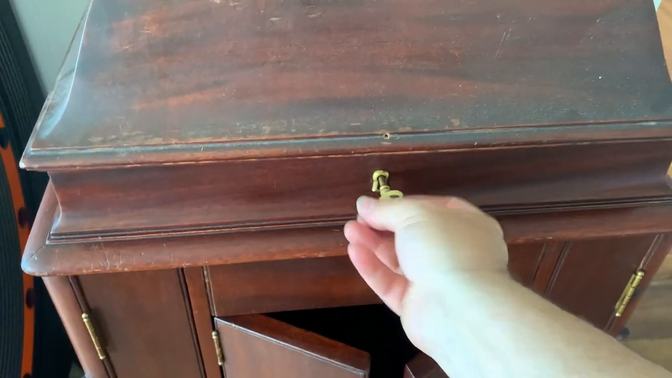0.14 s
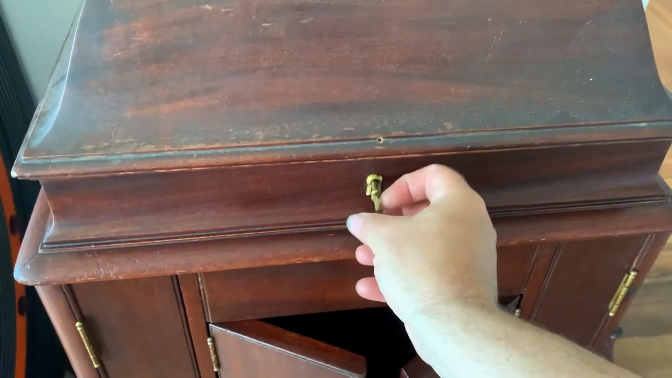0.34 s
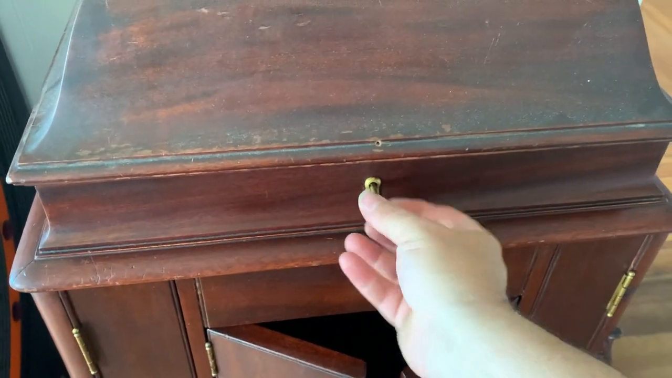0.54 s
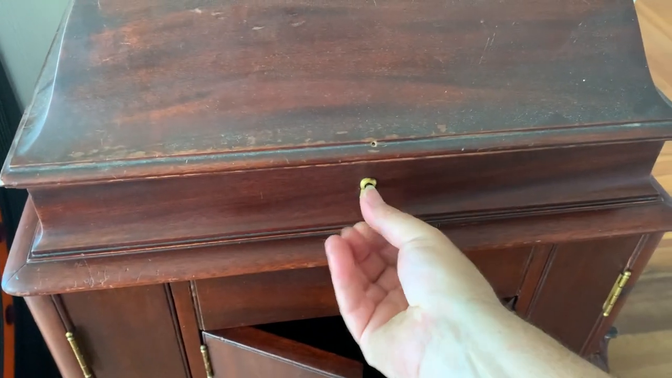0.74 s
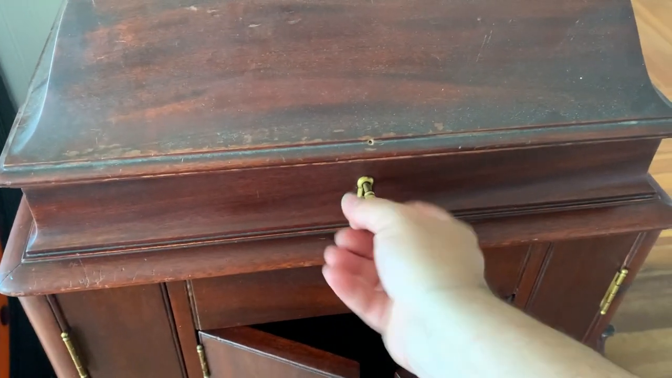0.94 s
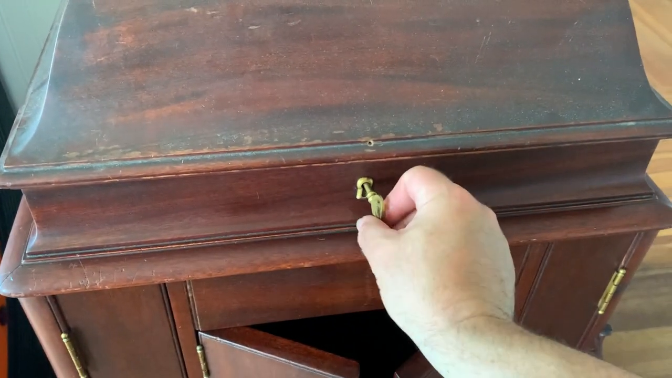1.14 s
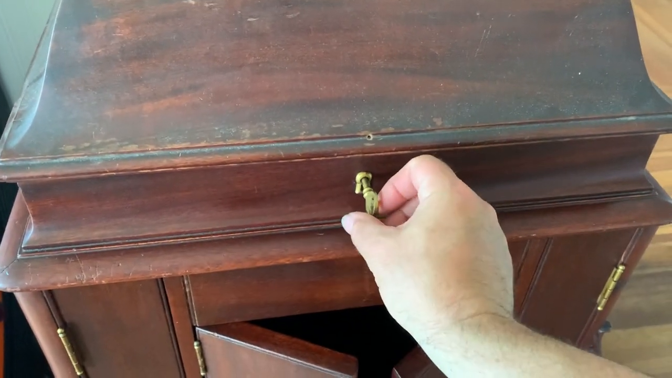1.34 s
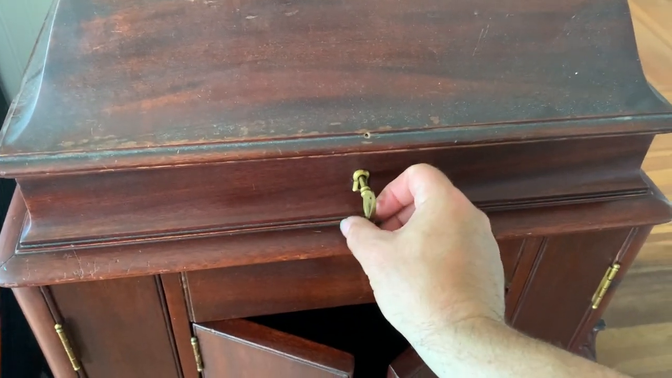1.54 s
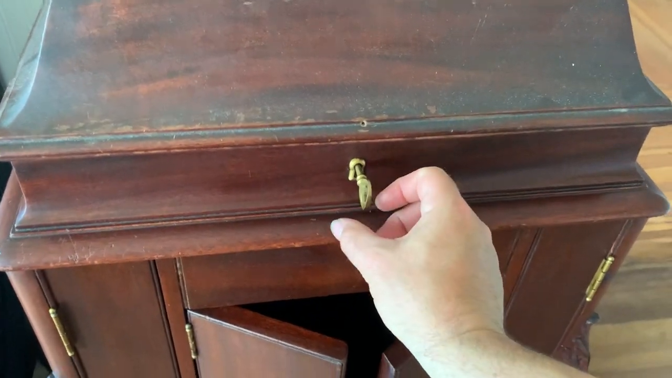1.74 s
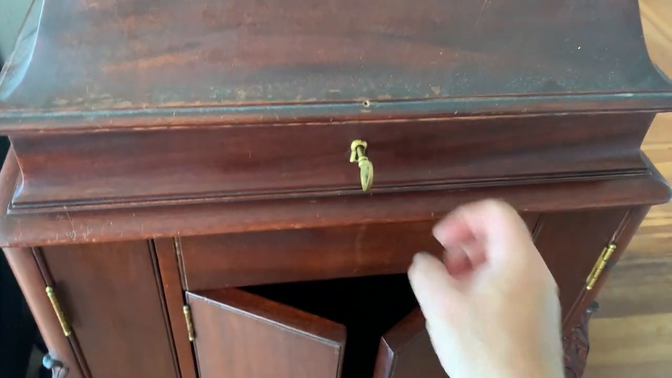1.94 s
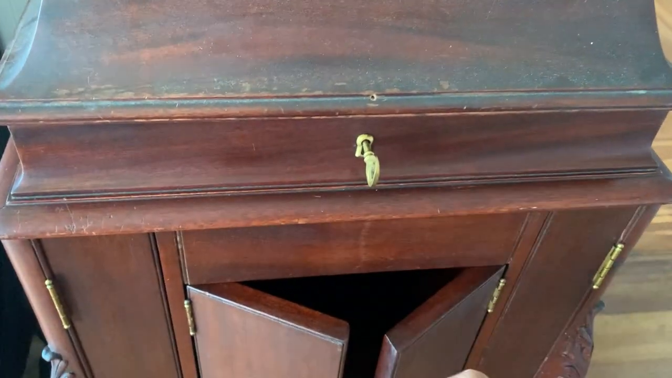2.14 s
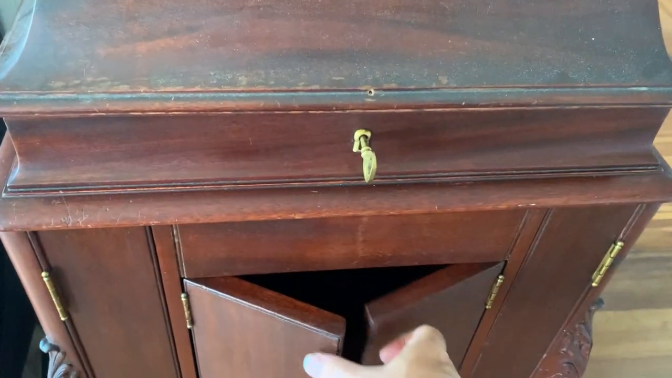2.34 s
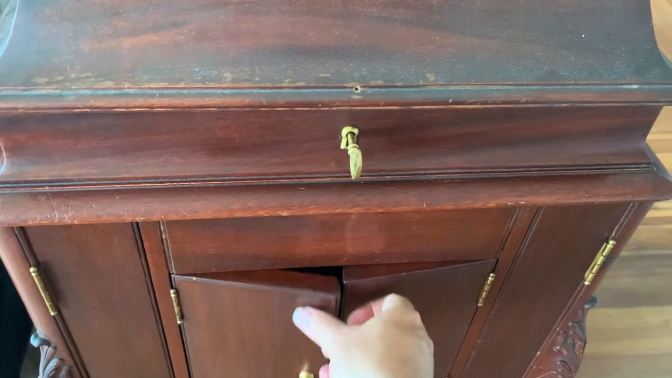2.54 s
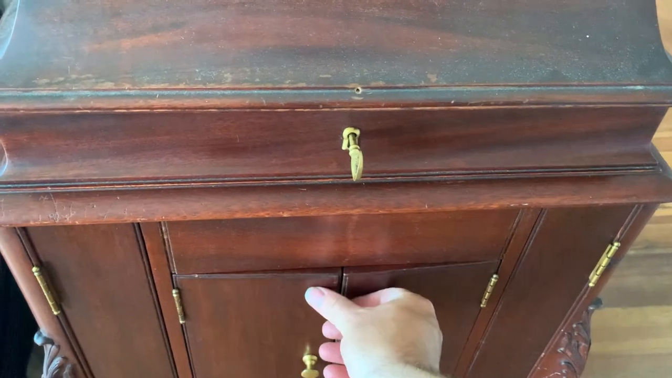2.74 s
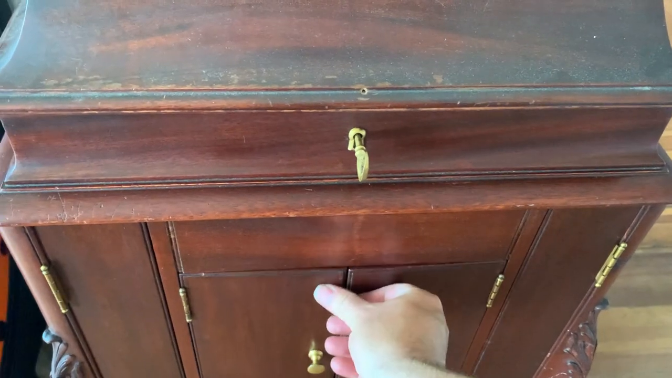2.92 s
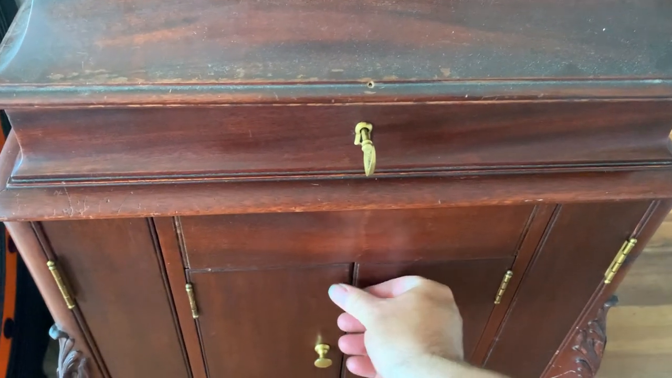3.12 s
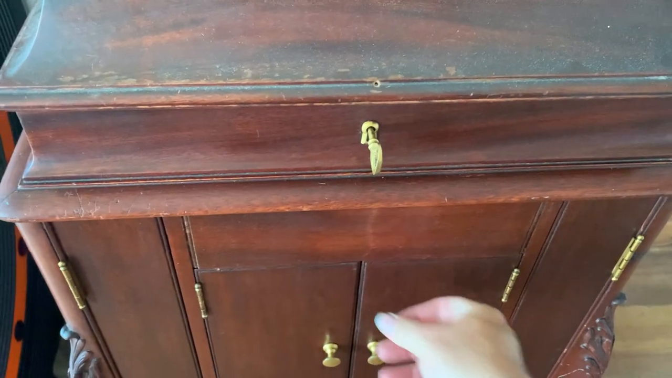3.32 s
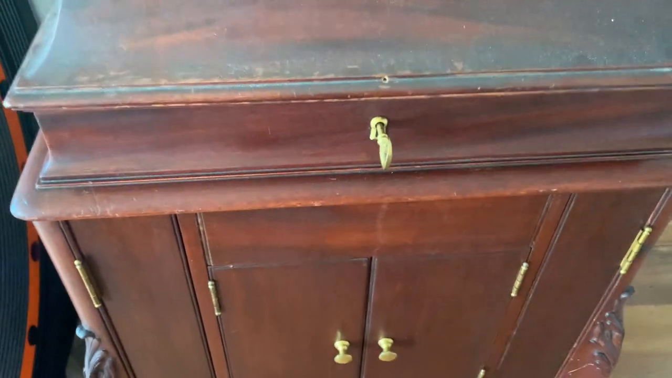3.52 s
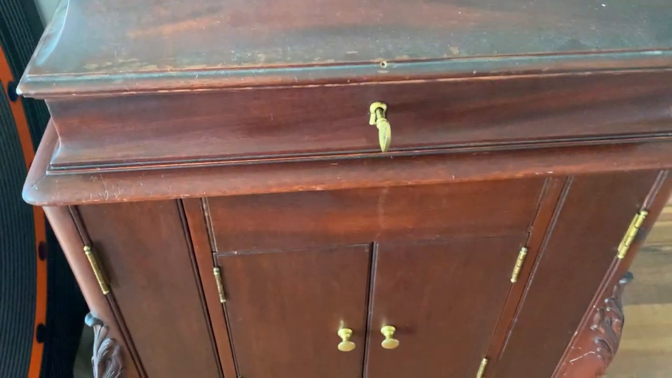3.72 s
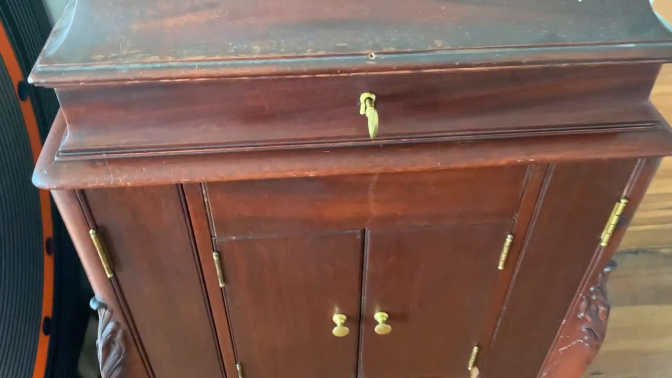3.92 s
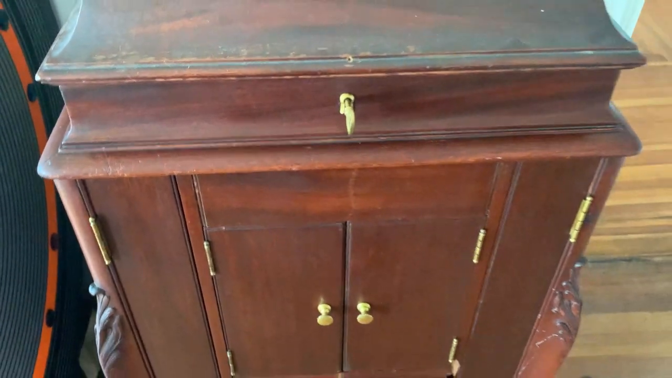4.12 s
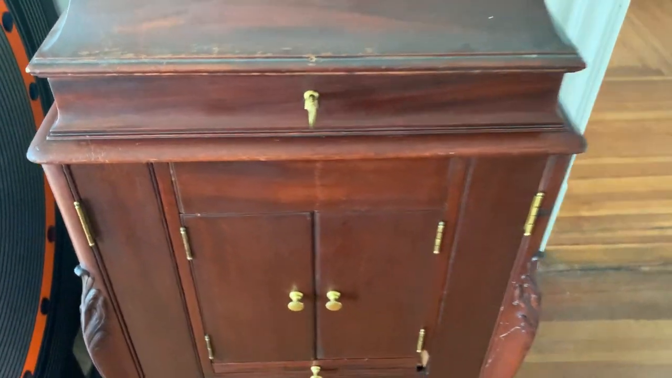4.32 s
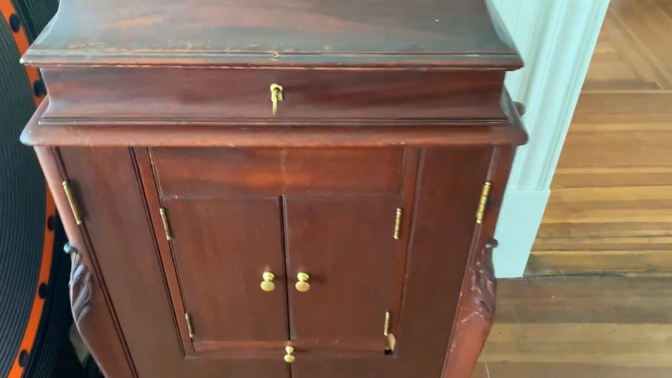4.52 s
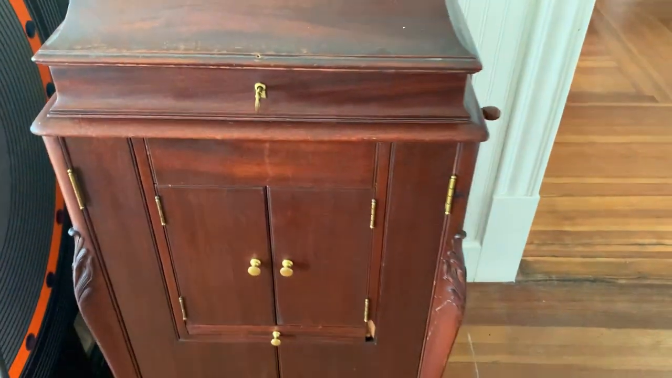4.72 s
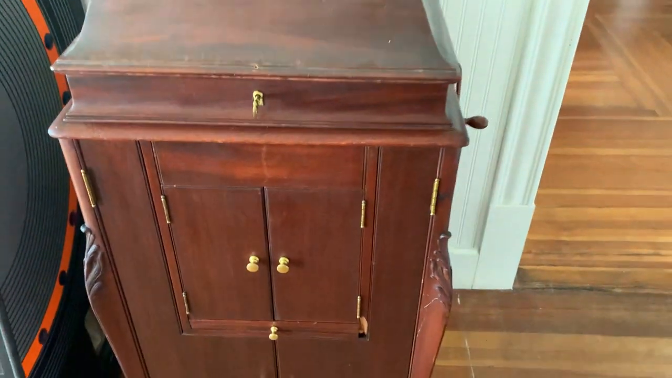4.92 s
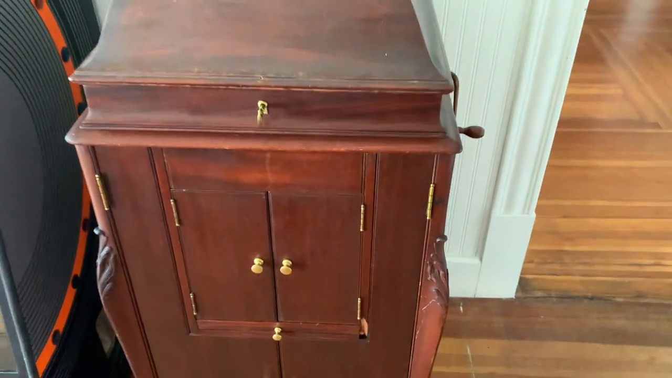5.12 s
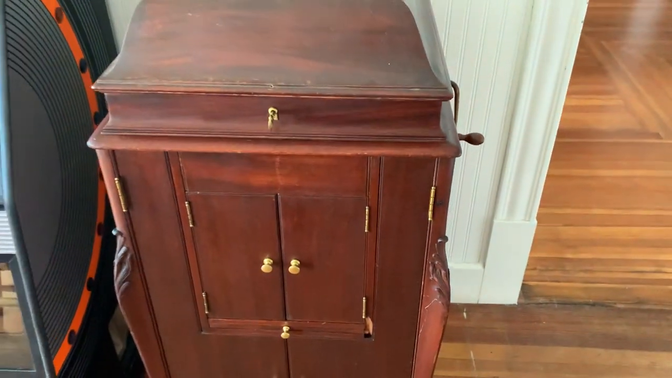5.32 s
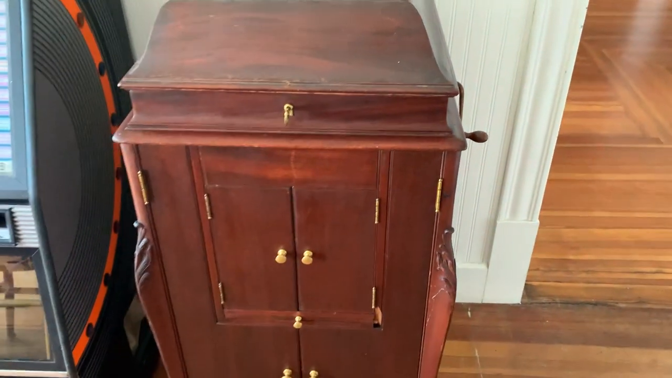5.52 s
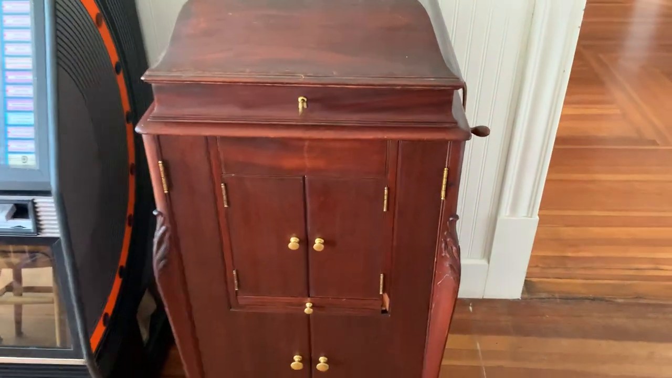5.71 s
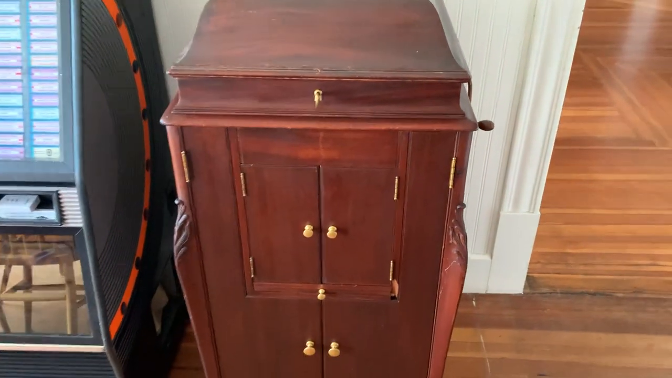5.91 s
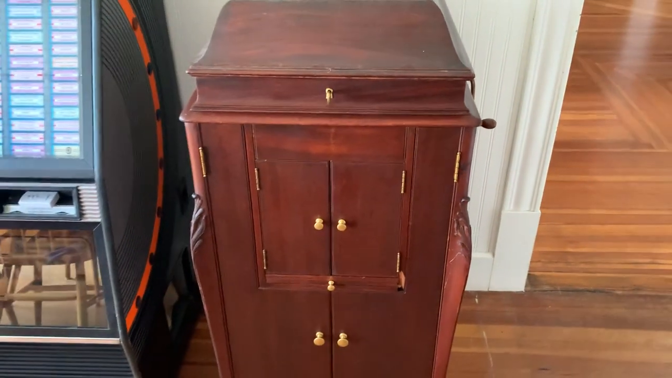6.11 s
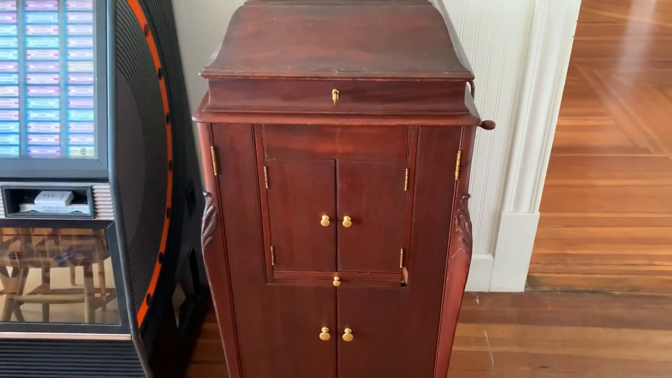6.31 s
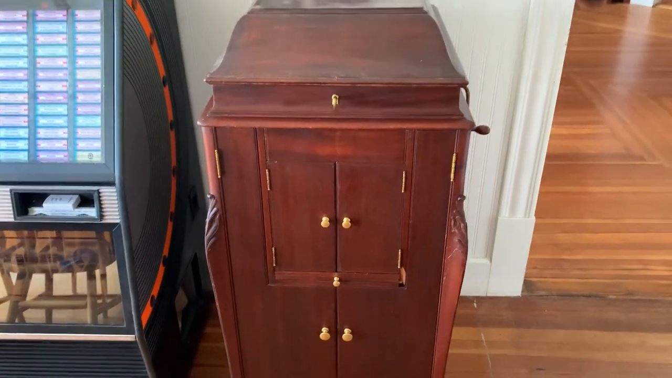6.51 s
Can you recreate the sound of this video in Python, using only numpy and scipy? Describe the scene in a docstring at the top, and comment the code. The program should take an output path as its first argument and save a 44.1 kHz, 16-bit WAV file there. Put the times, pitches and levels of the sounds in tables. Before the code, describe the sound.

A small brass key clicks faintly in an old wooden cabinet, then two little doors shut with a light knock and a loud hollow double clack.

```python
"""A brass key clicks and rubs in the lid of an old wooden cabinet; its two small doors are pushed shut with
a light knock, a touch and a loud double clack that booms in the case; steps go back over ticking boards.
Contacts are noise bursts and decaying modes, rubbing is grains of noise, thuds are swelling sines.
A live room adds a diffuse tail, ventilation noise, a low hum and a faint whirr, heard by a hand-held phone."""
import sys
import numpy as np
from scipy import signal
from scipy.fft import rfft, irfft
from scipy.io import wavfile
from scipy.ndimage import uniform_filter1d

SR = 44100
rng = np.random.default_rng(int(sys.argv[2]) if len(sys.argv) > 2 else 0)


def bounce(signal):
    """Save signal as a 16-bit WAV file at the path given by the first command-line argument."""
    frames = np.transpose(np.atleast_2d(signal))
    limited = np.clip(frames, -1, 1)
    pcm = np.round(limited * 32767).astype(np.int16)
    wavfile.write(sys.argv[1], SR, pcm)


N = 293696
T = np.arange(2 ** 15) / SR  # time since a blow, s
TIME = np.arange(N) / SR  # time in the scene, s

# clicks of the brass key and its tag in the lock; levels are relative:
# start_s, level_db, body_db, treble_db
KEY_CLICKS = [(0.0382, -39.5, 1, -24), (.055, -49.5, 6.5, -8.5), (.347, -44.5, -6, -17),
              (0.422, -43, -22, -4.5), (.593, -41, -6.5, -19), (0.926, -43, -3, -33), (.980, -35, -11, -11),
              (0.997, -42.5, -1.5, -3), (1.0255, -36.5, -24, 6), (1.1192, -38.5, -18, -4),
              (1.4228, -34, -8, -13), (1.4262, -38.5, 0, -27)]


def doors():
    """Impact excitation: each blow cracks at the edge and rings the door's panel modes and the brass catch."""
    # a door meets its frame; levels are relative:
    # start_s, door, panel_db, crack_db, crack_treble_db, catch_db
    impacts = [(2.6976, "left", -38, -30.5, -10, -47), (2.7011, "left", -26.5, -45, -18, -52.5),
               (2.7109, "left", -31, -37, -5, -38.5), (2.9393, "right", -38.5, -35.5, -9, -39),
               (2.945, "left", -37, -51, -19.5, -63), (2.9720, "left", -43.5, -56, -26.5, -65),
               (3.0241, "right", -9.5, -8.5, -3.5, -25), (3.0344, "right", -19, -15, -11, -36),
               (3.0402, "right", -9, -5.5, -3.5, -15.5), (3.051, "right", -23.5, -20.5, -6, -34.5)]
    # panel modes by door: frequency_hz, level_db, t60_s
    panel_modes = {"left": [(123.5, -8.5, 0.31), (241, 2, .09), (347, -8.5, 0.1), (385, -8, .14),
                   (880, -13.5, 0.024), (994, -2.5, 0.067), (1170, -16.5, 0.014), (1380, -14.5, 0.022),
                   (2280, -14.5, .03)], "right": [(151, -12, 0.27), (244, -14.5, 0.3), (345, -5.5, 0.13),
                   (454, -9.5, 0.23), (510, -4, 0.1), (579.4, -2.5, 0.17), (605, -5, 0.15),
                   (745, -16, 0.069), (855, -17.5, 0.042), (964, -5.5, .05), (1020, -13, 0.088),
                   (1180, -17.5, 0.09), (1757, -24.5, .1), (2130, -20, 0.044)]}
    # modes of the brass catch: frequency_hz, level_db, t60_s
    catch_modes = [(2282, -8.5, 0.015), (2520, 3, 0.043), (2630, -8.5, 0.032), (2735, -5, 0.078),
                   (4420, -10.5, .03)]
    # spectrum of the crack: frequency_hz, level_db
    crack_colour = [(100, 3), (330, 13), (550, 7.5), (800, 1), (1150, -0.5), (1450, -3), (2600, 0.5),
                    (3300, -5.5), (4200, -3.5), (5300, -9), (7200, -0.5), (11000, -0.5), (15000, -13)]
    cracks, rings = np.zeros(N), np.zeros(N)
    catch = ring(catch_modes)
    for s, door, panel_db, crack_db, treble_db, catch_db in impacts:
        edge = crack(crack_colour, t60=0.036, ring_db=-14.5, ring_t60=0.12)
        edge = tint(edge, [(2800, 0.0084), (7000, treble_db)])
        add(cracks, s, amp(crack_db) * edge)
        panel = ring(panel_modes[door])
        add(rings, s, amp(panel_db) * panel + amp(catch_db) * catch)
    return cracks, rings


def boom():
    """Cavity resonance: the case's deep modes build up over a few cycles, then die away quickly."""
    # slow modes of the hollow case: frequency_hz, level_db, swell_s
    case_modes = [(66.1, -19.5, 0.028), (109.6, -16.5, 0.044), (128.3, -27.5, 0.037)]
    # each door's shutting sets the case booming: start_s, level_db
    shuttings = [(2.708, -25.5), (3.034, -0.5)]
    case = 0
    for hz, db, rise_s in case_modes:
        case = case + amp(db) * swell(T, rise_s) ** 2 * np.sin(2 * np.pi * hz * T)
    out = np.zeros(N)
    for s, db in shuttings:
        add(out, s, amp(db) * case)
    return out


def key():
    """Light metal impacts coupled to wood: the key clicks, lid and lock ring, and the brass rubs."""
    # spectrum of a key contact: frequency_hz, level_db
    key_colour = [(100, -19), (250, -5), (500, 4), (900, -1.5), (1500, 3.5), (3000, -3.5), (4200, -3.5),
                  (5600, -6.5), (11000, -2), (15000, -70)]
    # small ring of lid and lock under the key: frequency_hz, level_db, t60_s
    lid_modes = [(460, -17, 0.11), (582, -17, 0.17), (748, -19.5, 0.12), (1348, -21.5, 0.19),
                 (1500, -13.5, 0.033), (1840, -35, 0.046), (2743, -17, 0.087), (4040, -12.5, 0.051)]
    taps = clicks(KEY_CLICKS, key_colour, lid_modes, t60=0.029, ring_db=-10.0, ring_t60=0.19)
    return amp(1) * taps + rubs()


def rubs():
    """Stick-slip friction: the key and the right door's edge catch and slip in dense, uneven grains."""
    slips_per_s = 3500
    slips = rng.standard_normal(N) * (rng.random(N) < slips_per_s / SR)
    grains = tint(slips, [(150, -9.5), (550, 5.5), (900, 1.5), (2500, 2.0), (5000, -6.5), (12000, -23.5)])
    # the right door's edge scrapes as it shuts
    press = amp(-43.5) * arch(2.996, 3.04)
    # brass drags around each click, the more the stronger and brighter the click
    rub_db, rub_per_treble = -20, 0.55  # dB, dB per dB of treble
    lead_s, trail_s = 0.012, 0.04
    for s, db, _, treble_db in KEY_CLICKS:
        drag_db = db + rub_db + rub_per_treble * treble_db
        press = press + amp(drag_db) * arch(s - lead_s, s + trail_s)
    return press * grains / np.std(grains)


def wood_ticks():
    """Sudden release of strain: wood under load ticks in doors and floor, then settles in small slips."""
    # ticks; levels are relative: start_s, level_db, body_db, treble_db
    releases = [(3.4424, -51, -3.5, -4), (3.4840, -49, -2, -28), (3.7065, -39, -6, -27),
                (3.7654, -49, -14, -14), (4.3344, -48.5, -24, -11.5), (4.5008, -35, -4.5, 1),
                (4.5025, -26.5, -14, 0), (5.5842, -44, 2.5, 2), (5.590, -42, -1, -11),
                (6.2272, -47, -15, -6.5), (6.530, -53.5, 7, -31)]
    # spectrum of a tick: frequency_hz, level_db
    tick_colour = [(100, -15), (230, -5.5), (550, 4.5), (950, 0), (1400, -6), (1850, -0.5), (3000, -6.5),
                   (5500, -7.5), (11000, -0.5), (15000, 5.5)]
    # floorboard modes: frequency_hz, level_db, t60_s
    board_modes = [(229, -22.5, 0.17), (403.4, -31, 0.023), (630.5, -18, 0.099), (1797, -14, 0.057),
                   (3030, -15, .025)]
    rows = with_slips(releases, count=2)
    return amp(3.5) * clicks(rows, tick_colour, board_modes, t60=0.021, ring_db=-9.5, ring_t60=0.22)


def with_slips(ticks, count):
    """Successive relaxation: each tick is followed by weaker slips at uneven intervals."""
    gap_s, slip_db, slip_body_db, slip_treble_db = 0.018, -11.5, 7.5, -1  # changes from the tick
    gaps = gap_s * np.exp(0.23 * rng.standard_normal((len(ticks), count)))
    lags = np.cumsum(gaps, axis=1)
    rows = list(ticks)
    for (s, db, body_db, treble_db), tick_lags in zip(ticks, lags):
        for lag in tick_lags:
            rows.append((s + lag, db + slip_db, body_db + slip_body_db, treble_db + slip_treble_db))
    return rows


def thuds():
    """Damped soft impacts: feet all sound the floor's one low note; soft knocks have their own pitch."""
    # footfalls and shifts of weight: start_s, level_db
    footfalls = [(3.48, -41), (4.11, -44.5), (4.281, -44), (4.336, -41.5), (4.885, -46), (5.08, -43)]
    # soft, dull knocks of hand and wood: start_s, level_db, pitch_hz
    pats = [(.925, -42, 750), (1.127, -50.5, 440), (2.322, -47, 312.4), (2.73, -34.5, 228),
            (2.938, -32.5, 332.6), (3.704, -42, 262), (4.178, -47, 249), (4.5, -42.5, 332),
            (5.588, -55, 215)]
    out = np.zeros(N)
    for s, db in footfalls:
        add(out, s, amp(db) * bump(65.7, rise_s=0.0086))
    swell_cycles = 3.3  # a lower knock lasts longer
    for s, db, hz in pats:
        add(out, s, amp(db) * bump(hz, swell_cycles / hz))
    return out


def rustle():
    """Sliding friction of cloth and skin: soft, fluttering noise that swells with each movement."""
    # spectrum of the cloth: frequency_hz, level_db
    cloth_colour = [(90, -15), (230, 10.5), (420, -1), (620, 3.5), (850, -14), (1400, -7), (2700, -9.5),
                    (4400, -18), (6000, -42), (12000, -38)]
    # turn the key, let it go, reach for the doors, draw back, step away:
    # middle_s, half_length_s, level_db
    moves = [(.55, 0.48, -60), (1.306, 0.36, -64), (2.5, .5, -57), (3.45, .35, -61.5), (4.798, .35, -68)]
    hz, noise = diffuse(N, alike_hz=700)
    cloth = irfft(noise * amp(at_hz(hz, cloth_colour)), N)
    motion = amp(-69)  # between movements
    for s, half, db in moves:
        motion = motion + amp(db) * np.exp(-((TIME - s) / half) ** 2)
    flutter = amp(0.85 * walk(29))
    return cloth / np.std(cloth) * motion * flutter


def room(x):
    """Reverberation: walls answer within milliseconds with a diffuse tail whose decay varies by band."""
    # echo by band, level against the direct sound: frequency_hz, t60_s, level_db
    bands = [(80, 0.56, -10.5), (246, 0.51, -3.5), (590, 0.6, -3.5), (1200, 0.55, -3), (3120, 0.64, -5),
             (6996, 0.43, -4.5), (14100, 0.41, -12)]
    hz, noise = diffuse(len(T), alike_hz=750)
    centres = [row[0] for row in bands]
    onset = 1 - np.exp(-(T / 0.007) ** 2)
    tail = 0
    for share, (_, t60, db) in zip(np.eye(len(bands)), bands):
        shape = fade(t60) * onset
        echoes = even(irfft(noise) * shape / np.linalg.norm(shape), width_hz=60)
        # each band cross-fades into its neighbours
        band = at_hz(hz, list(zip(centres, share)))
        tail = tail + amp(db) * irfft(rfft(echoes) * band)
    return signal.fftconvolve(x[None], tail[:, T < .65], axes=1)[:, :N]


def background():
    """Broadband flow noise: ventilation with unsteady rumble and steady hiss, and a hum that swells once."""
    # ventilation spectrum, relative level per Hz: frequency_hz, level_db
    air_colour = [(15, -38), (25, -9), (43, -3), (108, -6.5), (180, -13.5), (354, -19.5), (384, -23.5),
                  (531, -18.5), (936, -24), (2110, -22.5), (4370, -43.5), (7710, -53.5), (8590, -47.5),
                  (10700, -50), (16000, -55.5)]
    hz, noise = diffuse(N, alike_hz=580)
    noise = noise * amp(at_hz(hz, air_colour))
    upper = at_hz(hz, [(150, 0.22), (500, 0.93)])
    low = irfft(noise * (1 - upper), N)
    high = irfft(noise * upper, N)
    rumble = low * amp(-1.5 + 1.6 * walk(8.5))
    hiss = high * amp(1.98)
    air = amp(-56) * (rumble + hiss) / np.std(low + high)
    hum_hz, hum_db, hum_start_s, hum_swell_s = 105, -52.5, 5.25, 0.29
    tone = np.sin(2 * np.pi * hum_hz * TIME + 0.48 * walk(rate=29))
    return air + amp(hum_db) * swell(TIME - hum_start_s, hum_swell_s) * tone


def whirr():
    """Narrow-band noise: random amplitudes on two quadrature carriers whose shared pitch wanders."""
    centre_hz, drift_hz, level_db = 2156, 44.5, -70.5
    phase = 2 * np.pi * np.cumsum(centre_hz + drift_hz * walk(1.8)) / SR
    return amp(level_db) * (walk(220) * np.cos(phase) + walk(220) * np.sin(phase))


def crack(colour, t60, ring_db, ring_t60):
    """Hard contact as a wideband impulse: a snap and a short ring of countless dense modes."""
    burst = rng.standard_normal(len(T)) * (fade(t60) + amp(ring_db) * fade(ring_t60))
    burst = even(burst, width_hz=290) * (T < T[-1] / 2)
    return tint(burst, colour)


def clicks(rows, colour, modes, t60, ring_db, ring_t60):
    """Small impacts: contact spectrum and modal ring, each with its own woody body and bright tip."""
    out, wood = np.zeros(N), ring(modes)
    for s, db, body_db, treble_db in rows:
        balance = [(450, body_db + 6.5), (1200, 0.0096), (3200, 0), (9000, treble_db - 12.5)]
        body = tint(crack(colour, t60, ring_db, ring_t60) + wood, balance)
        # the edge itself lets go in an instant
        tip = crack([(4000, -16), (11000, -1.5), (15000, -20)], 0.01, -27, .02)
        add(out, s, amp(db) * (body + amp(treble_db + 6) * tip))
    return out


def bump(hz, rise_s):
    """Padded contact: a long contact time gives a swelling tone and a dull scuff around its pitch."""
    colour = [(hz / 3, -25), (hz * 0.48, 0), (hz * 1.6, -2), (hz * 3, -25), (hz * 8, -60)]
    scuff = tint(rng.standard_normal(len(T)), colour)
    tone = np.sin(2 * np.pi * hz * T)
    return swell(T, rise_s) * (amp(-2.0) * tone + amp(-3.0) * scuff / np.std(scuff))


def ring(modes):
    """Modal superposition: modes struck together decay freely; neighbours swing in opposite senses."""
    out = 0
    for k, (hz, db, t60) in enumerate(modes):
        out = out + (-1) ** k * amp(db) * fade(t60) * np.sin(2 * np.pi * hz * T)
    return out


def swell(t, rise_s):
    """Build-up and decay: rises to 1 at rise_s, then dies away."""
    u = np.maximum(t, 0) / rise_s
    return u * np.exp(1 - u)


def arch(start, end):
    """Contact pressure as a half ellipse that comes and goes between two moments."""
    return np.sqrt(np.clip(1 - ((2 * TIME - start - end) / (end - start)) ** 2, 0, 1))


def fade(t60):
    """Exponential decay after a blow: 60 dB in t60 seconds."""
    return np.exp(-np.log(1000) * T / t60)


def walk(rate):
    """Smoothed random steps, rate per second: a wander with a spread near 1."""
    size = int(SR / rate)
    steps = np.repeat(rng.standard_normal(N // size + 1), size)
    return uniform_filter1d(steps, size)[:N]


def diffuse(size, alike_hz):
    """Diffuse-field coherence: noise spectra at two close ports, alike in the bass, unrelated in the treble."""
    hz = np.fft.rfftfreq(size, 1 / SR)
    mid, side = rfft(rng.standard_normal((2, size)))
    alike = .92 / (1 + (hz / alike_hz) ** 4)
    sign = np.array([[1], [-1]])
    return hz, mid * np.sqrt((1 + alike) / 2) + sign * side * np.sqrt((1 - alike) / 2)


def even(x, width_hz):
    """Spectral whitening: levels out a burst's chance peaks that are broader than width_hz."""
    z = rfft(x)
    power = uniform_filter1d(np.abs(z) ** 2, max(int(width_hz * len(T) / SR), 1))
    return irfft(z * np.sqrt(power.mean() / power))


def tint(x, points):
    """Minimum-phase filter with a (Hz, dB) response, by folding the cepstrum to positive time."""
    size = len(x)
    cep = irfft(np.log(amp(at_hz(np.fft.rfftfreq(size, 1 / SR), points))), size)
    cep[1:size // 2] *= 2
    cep[size // 2 + 1:] = 0
    return irfft(rfft(x) * np.exp(rfft(cep)), size)


def at_hz(hz, points):
    """Interpolation of (Hz, value) points on a logarithmic frequency axis."""
    f, value = np.transpose(points)
    return np.interp(np.log(hz + 1), np.log(f), value)


def amp(db):
    """Level to amplitude: decibels to gain."""
    return 10 ** (np.asarray(db) / 20)


def add(track, s, sound):
    """Linear superposition: mixes a sound in at time s."""
    start = max(int(s * SR), 0)
    track[start:start + len(sound)] += sound[:N - start]


def scene():
    """Direct-to-reverberant balance: each source is heard directly and sent to the room in its own measure."""
    cracks, rings = doors()
    dull, lock, ticks = thuds(), key(), wood_ticks()
    # panels face the phone and send less to the room; the floor is further off and wetter
    sent = cracks + amp(-7.5) * rings + amp(-2.5) * lock + amp(2.5) * ticks + amp(-2.5) * dull
    direct = cracks + rings + boom() + lock + ticks + dull
    return direct + room(sent) + rustle() + background() + whirr()


def record(dry):
    """Two-port pickup: phase gives width in the midrange, one delayed port feeds both channels in the treble."""
    hz = np.fft.rfftfreq(N, 1 / SR)
    # the phone drops the deepest bass
    bass_cut = signal.butter(3, 33, "highpass", fs=SR, output="sos")
    left, right = rfft(signal.sosfilt(bass_cut, dry))
    # the ports see the midrange from different angles: (Hz, phase between channels in radians)
    angle = at_hz(hz, [(350, 0.25), (1000, 0.18), (2200, 1.1), (4000, 1.6), (6000, 0.03)])
    width = np.exp(.5j * angle)
    left, right = left * width, right / width
    # from 5.8 to 7 kHz the left channel goes over to the right port, 1/4720 s late
    single = np.clip((hz - 5800) / 1200, 0, 1)
    late = np.exp(-2j * np.pi * (hz - 6250) / 4720)
    left = np.sqrt(1 - single) * left + np.sqrt(single) * late * right
    top_cut = signal.ellip(8, .2, 90, 15600, fs=SR, output="sos")
    return signal.sosfilt(top_cut, irfft(np.array([left, right]), N))


dry = scene()
out = record(dry)
bounce(out)
```